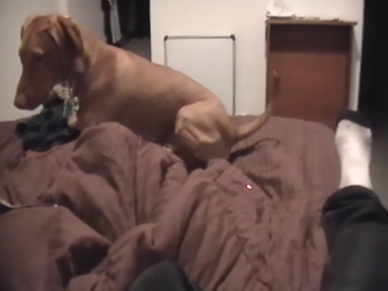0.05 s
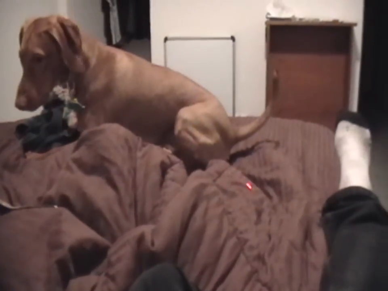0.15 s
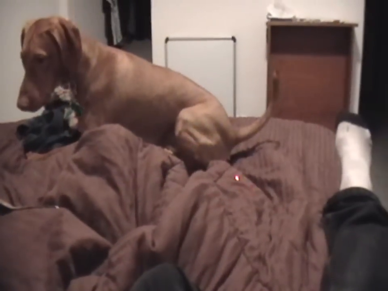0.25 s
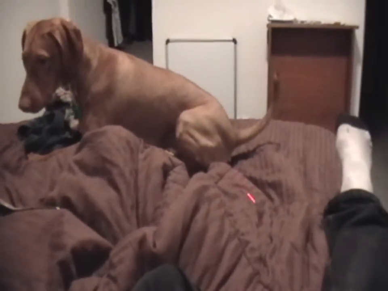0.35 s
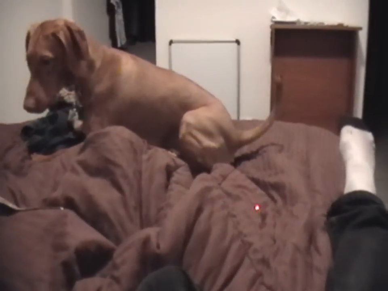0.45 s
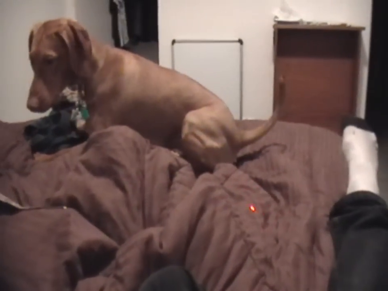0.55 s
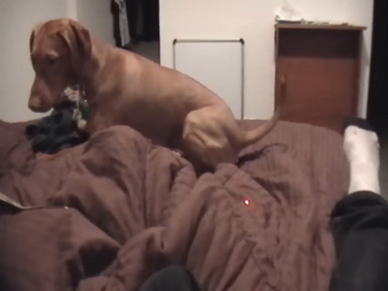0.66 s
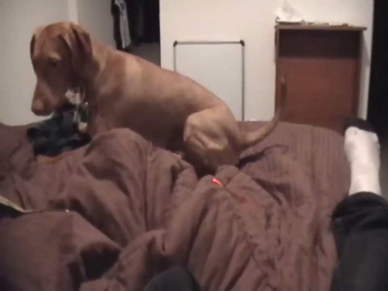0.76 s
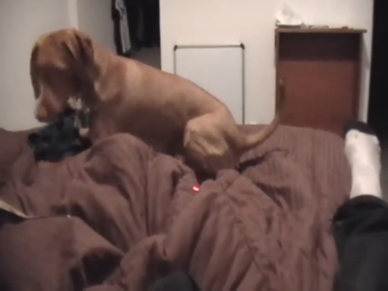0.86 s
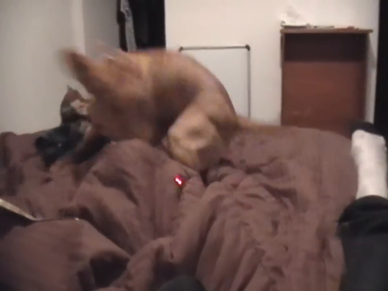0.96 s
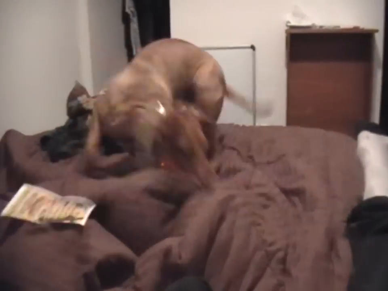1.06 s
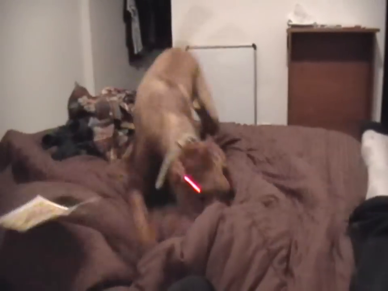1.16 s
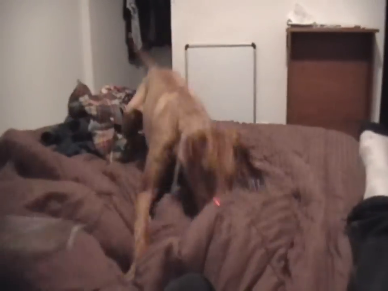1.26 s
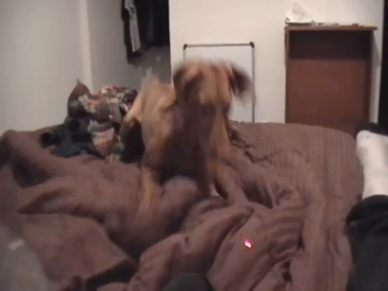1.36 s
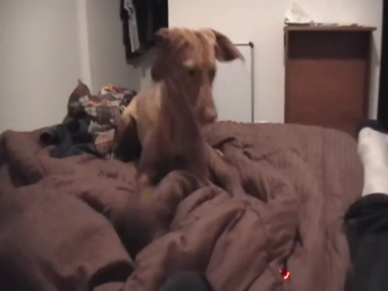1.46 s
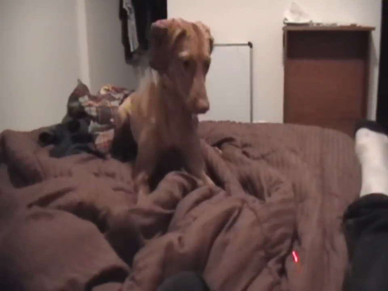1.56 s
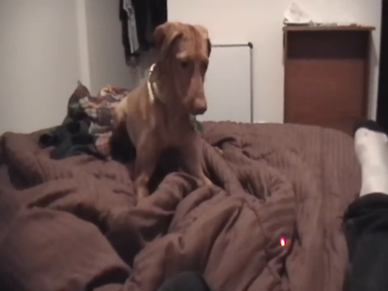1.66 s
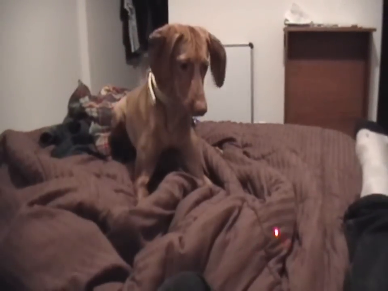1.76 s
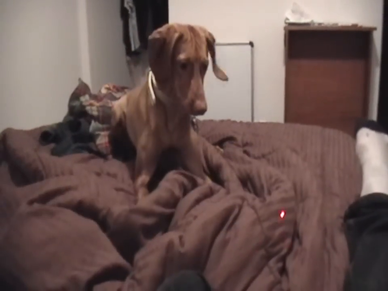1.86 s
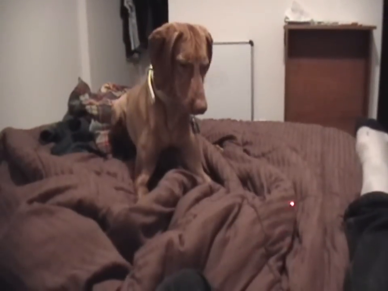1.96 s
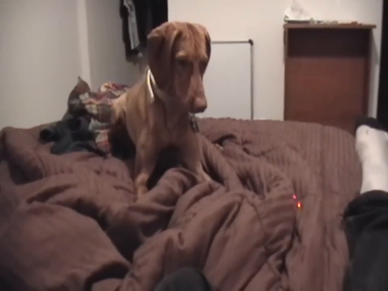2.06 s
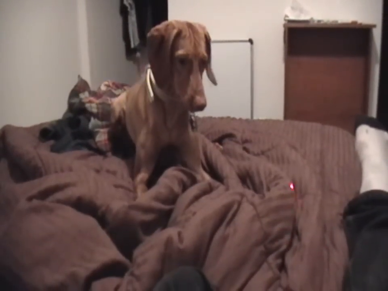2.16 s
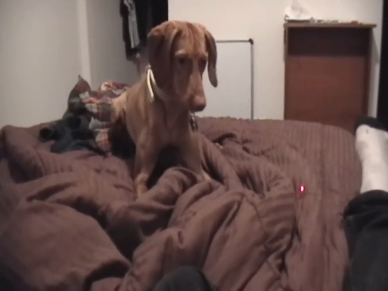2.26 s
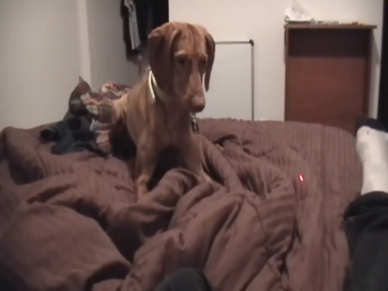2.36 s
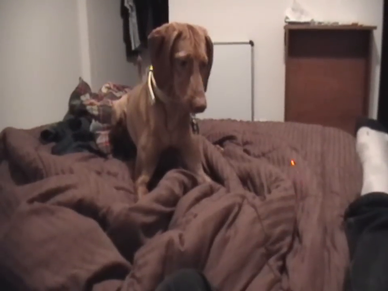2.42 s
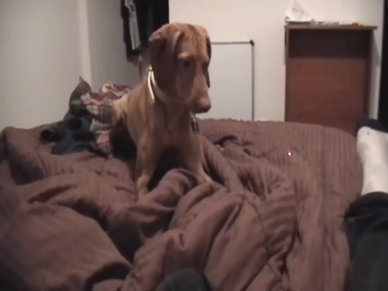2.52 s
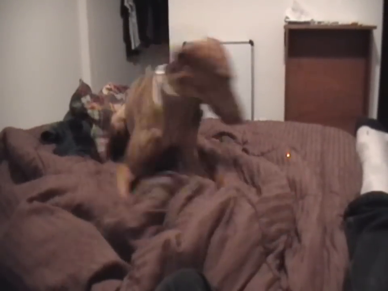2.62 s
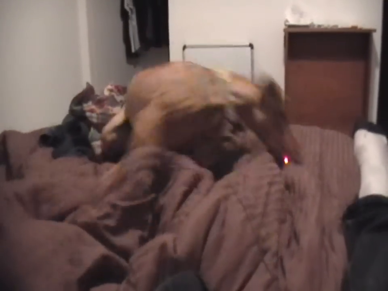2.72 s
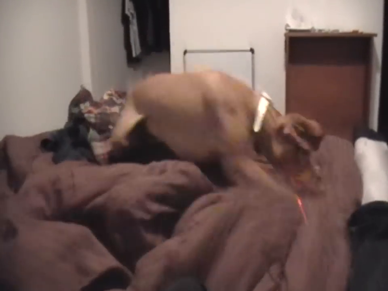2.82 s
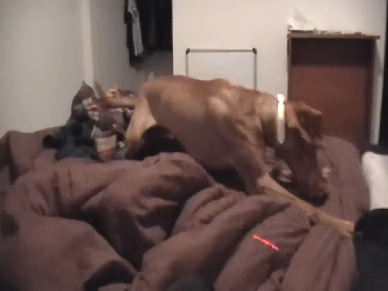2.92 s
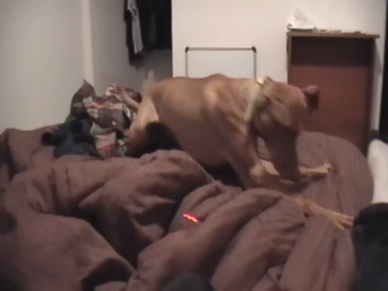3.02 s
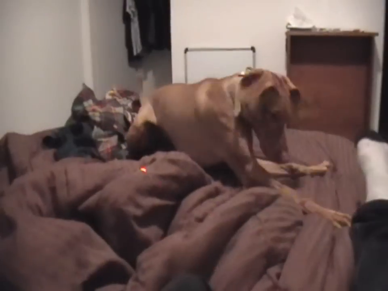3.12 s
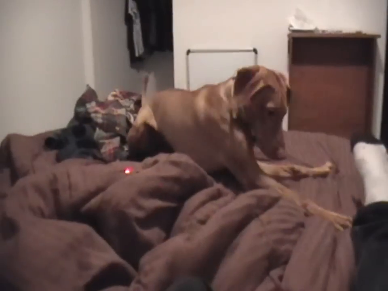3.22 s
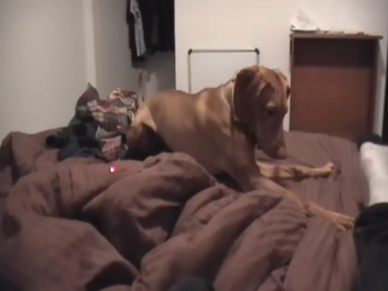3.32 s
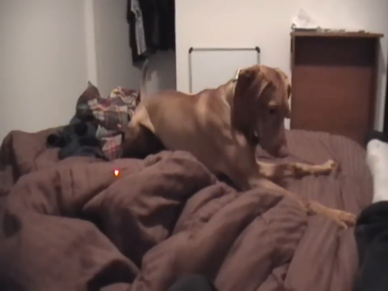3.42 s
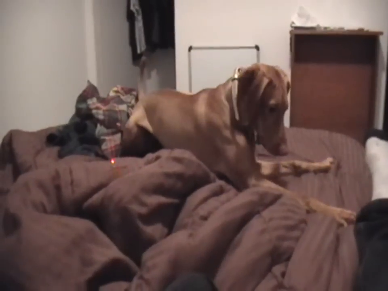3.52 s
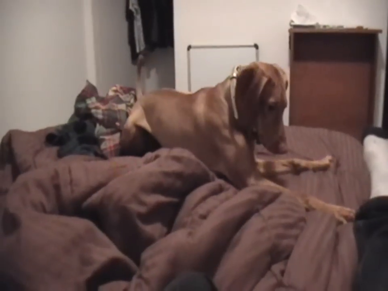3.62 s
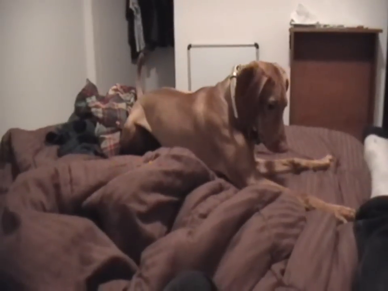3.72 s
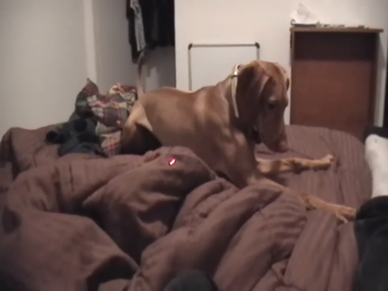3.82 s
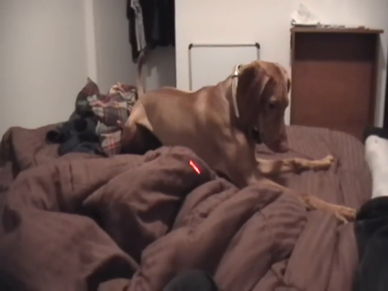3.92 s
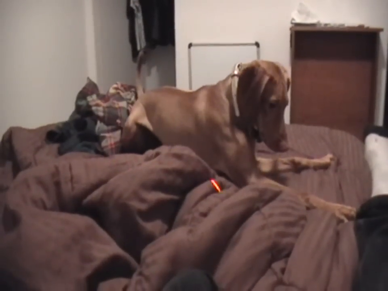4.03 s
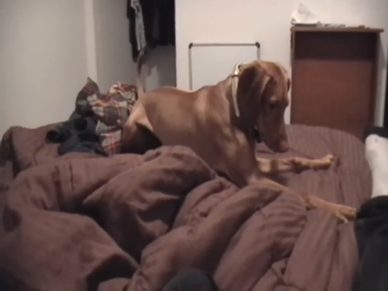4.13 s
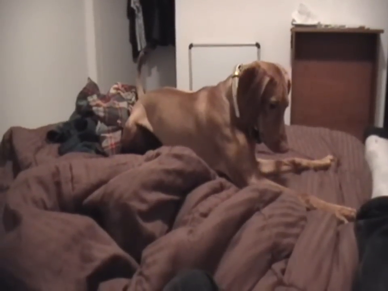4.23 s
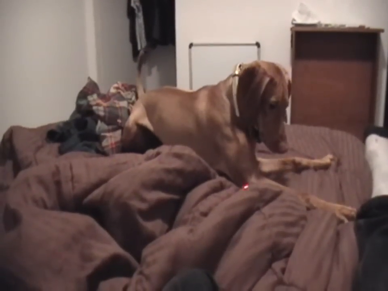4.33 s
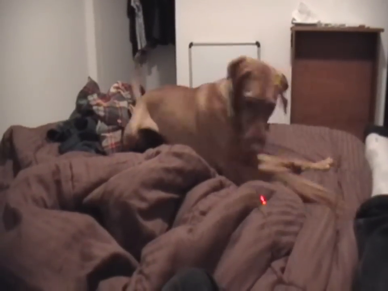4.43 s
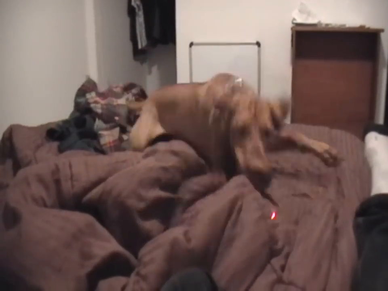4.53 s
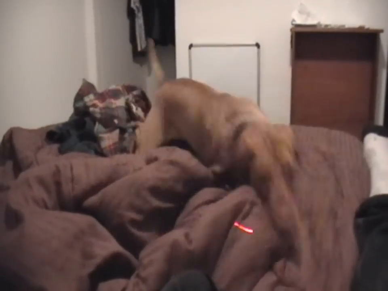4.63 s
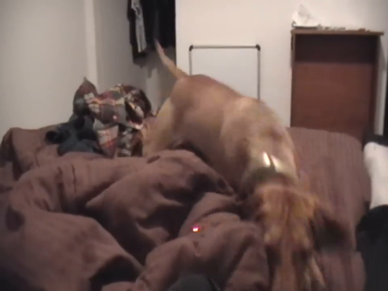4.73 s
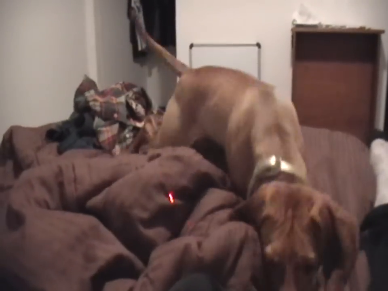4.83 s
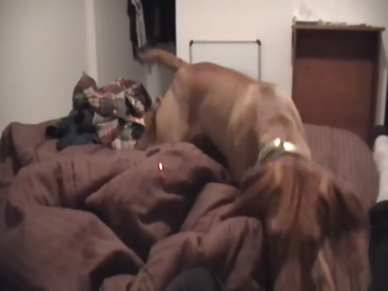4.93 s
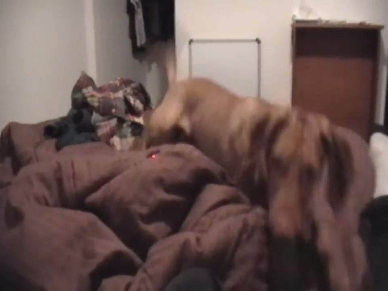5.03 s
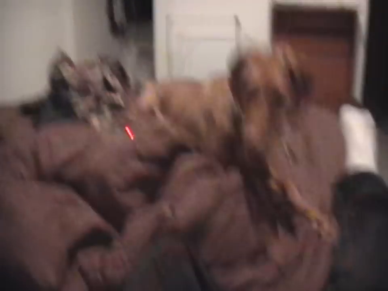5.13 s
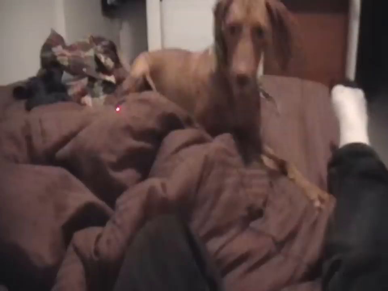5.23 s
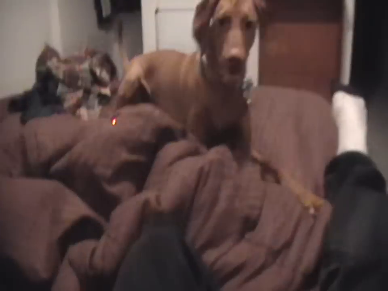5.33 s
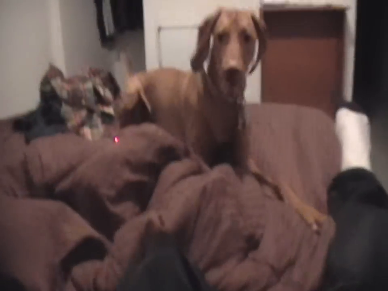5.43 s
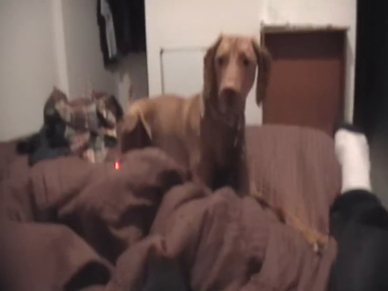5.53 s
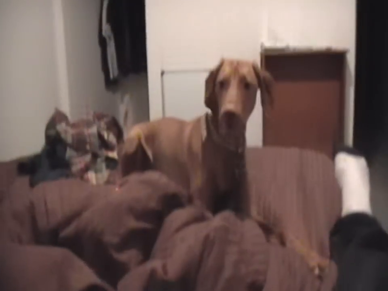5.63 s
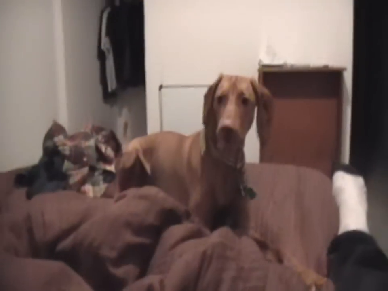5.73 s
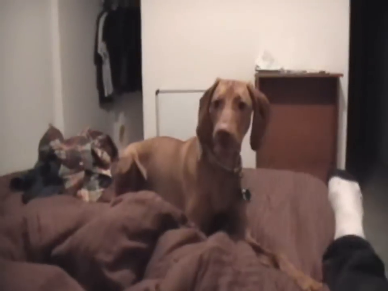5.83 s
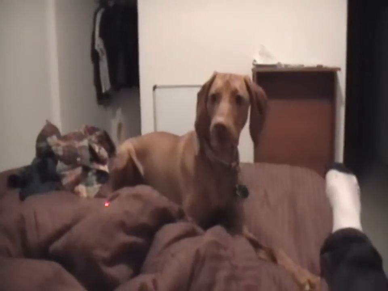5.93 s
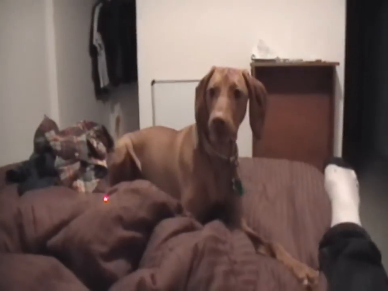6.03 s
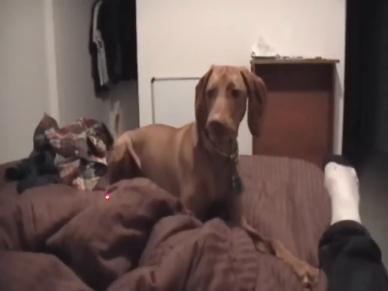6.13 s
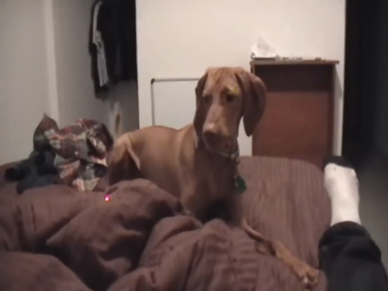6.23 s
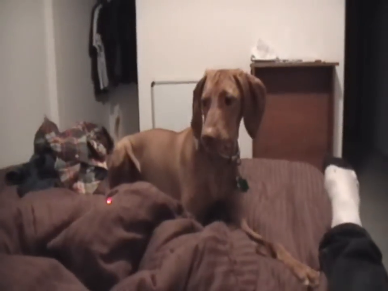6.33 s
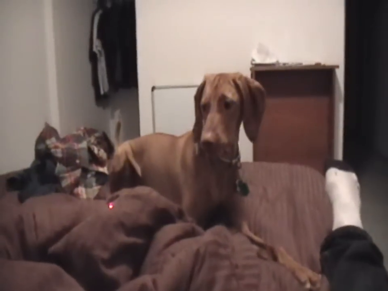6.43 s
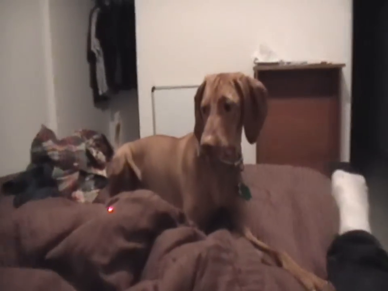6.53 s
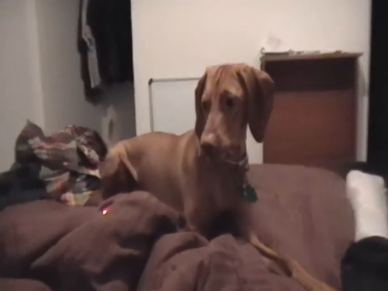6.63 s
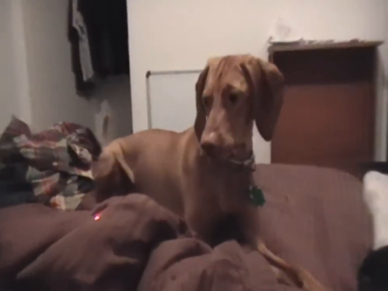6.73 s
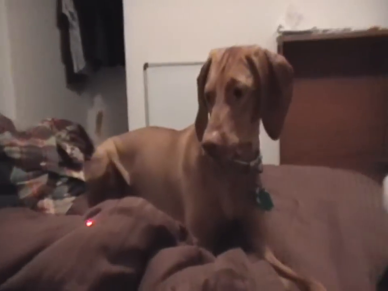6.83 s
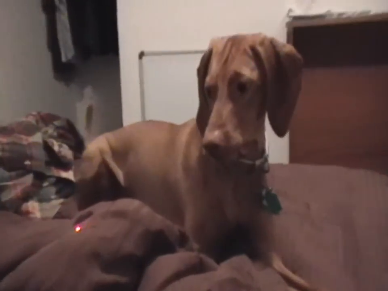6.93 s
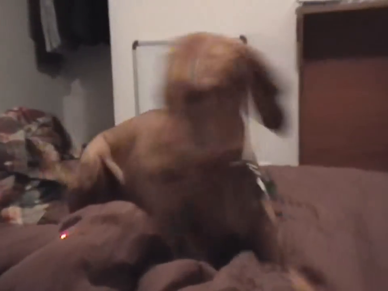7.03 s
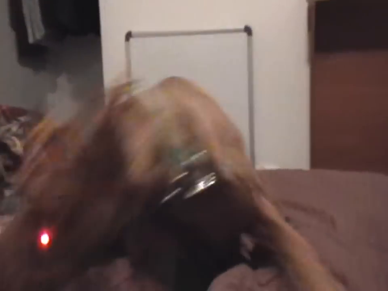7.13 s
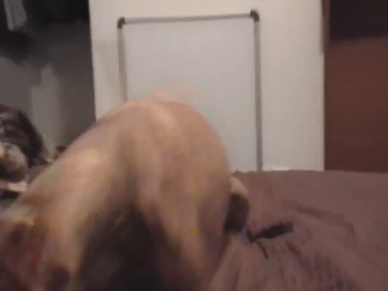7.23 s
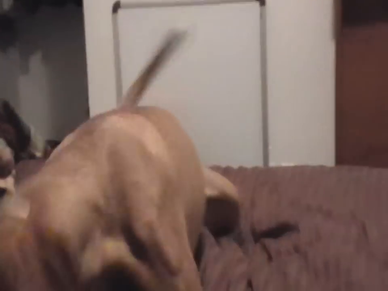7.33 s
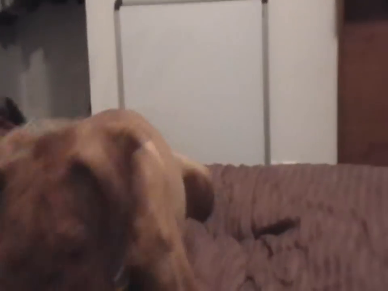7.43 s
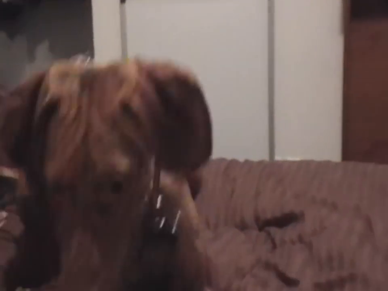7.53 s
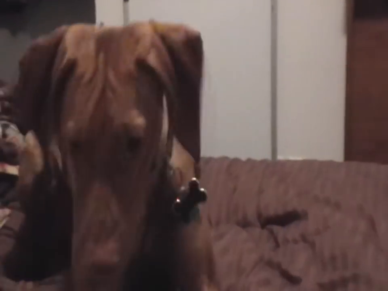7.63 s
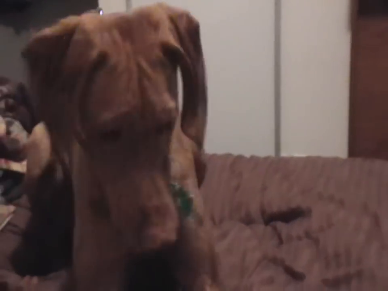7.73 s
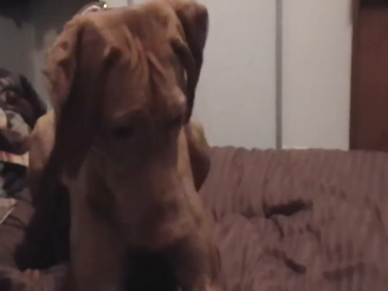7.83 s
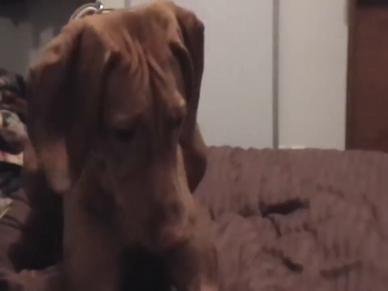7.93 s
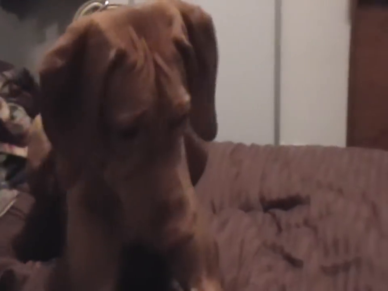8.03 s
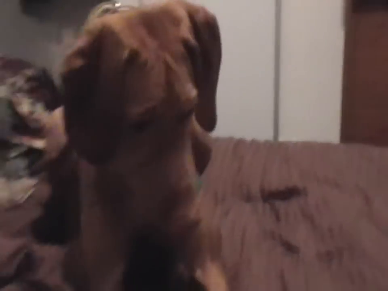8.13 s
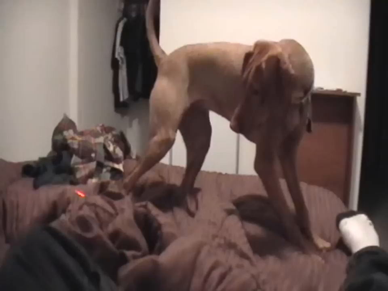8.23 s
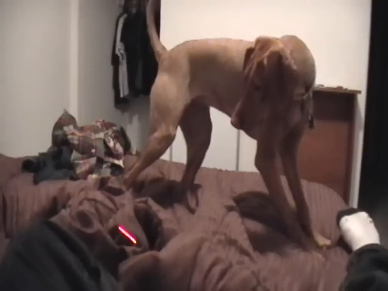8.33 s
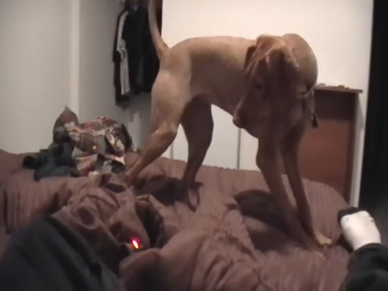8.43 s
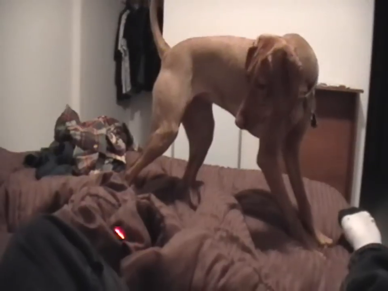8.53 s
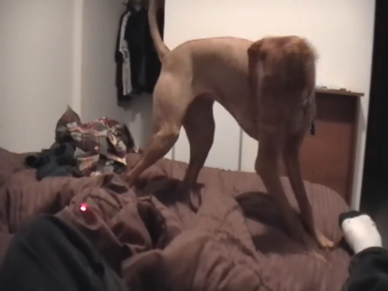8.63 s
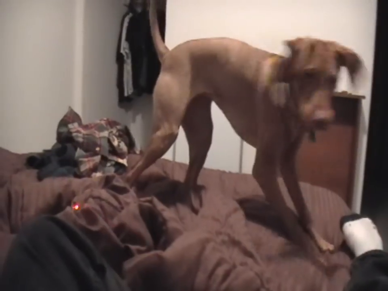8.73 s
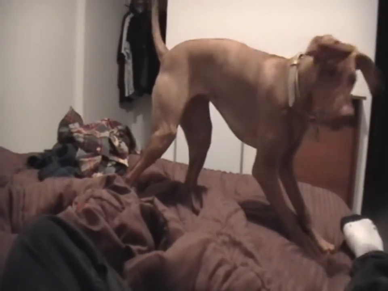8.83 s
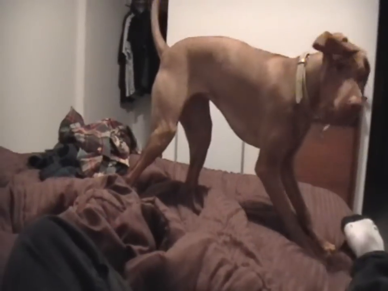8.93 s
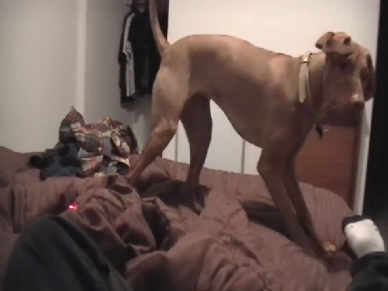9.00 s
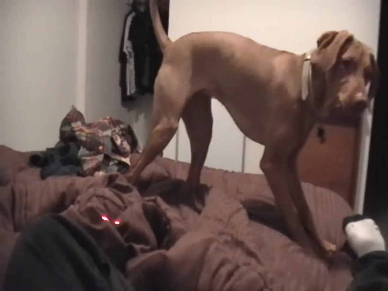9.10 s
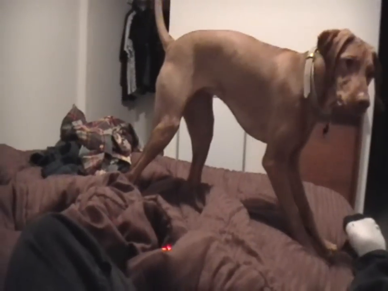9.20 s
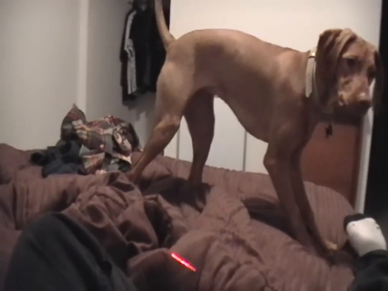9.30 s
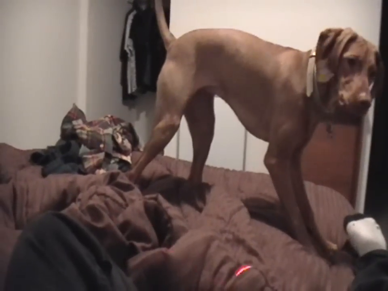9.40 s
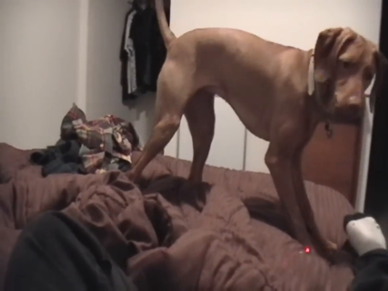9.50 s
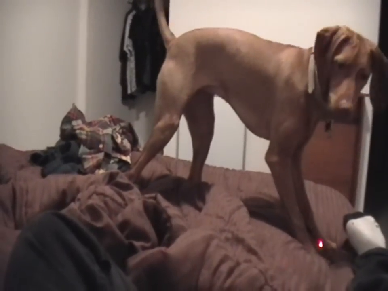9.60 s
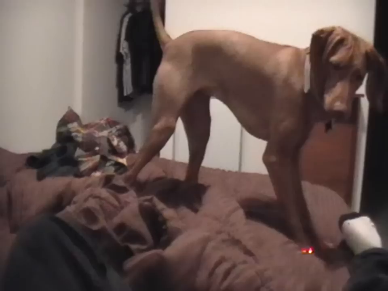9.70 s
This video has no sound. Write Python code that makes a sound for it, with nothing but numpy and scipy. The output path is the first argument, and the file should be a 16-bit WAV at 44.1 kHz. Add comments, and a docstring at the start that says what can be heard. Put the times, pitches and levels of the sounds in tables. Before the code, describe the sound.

Bright, dry tag clinks come in bursts, mostly pinched short, some ringing for a moment, with dull flat knocks among them. Each burst goes with a lunge: bedding swishes, paws scuff and thump the soft mattress. Near-silent gaps show only steady, soft fan noise. The strongest shake comes late, followed by a tiny wavering whine and a single clink. A close stereo microphone hears a small, slightly reverberant room.

```python
"""Collar tags, bedding and a small fan

A dog pounces after a spot of light on a bed in a small bedroom.
Its collar tags clack by broadband contact noise and ring briefly as decaying plate modes.
The duvet and collar rustle as filtered friction noise; paws slap, thud and boom the mattress.
The dog whines thinly once, as a wavering tone with one overtone; fan air noise and tones run on."""
import sys
import numpy as np
from scipy import signal
from scipy.fft import rfft, irfft
from scipy.io import wavfile

SR = 44100
rng = np.random.default_rng(int(sys.argv[2]) if len(sys.argv) > 2 else 0)


def dump_mix(stems):
    """Bounce the given channels to the path in sys.argv[1] as a 16-bit WAV at rate SR."""
    frames = np.atleast_2d(stems).T  # one column per channel
    limited = np.clip(frames, -1, 1)  # hard clip at full scale
    pcm = np.round(limited * 32767).astype(np.int16)
    wavfile.write(sys.argv[1], SR, pcm)


N = 430416
TIME = np.arange(N) / SR

# Event levels and spectra below are relative: scene() adds an offset to most of them.
LARGE, MIDDLE, SMALL = 6580, 6900, 7300   # nominal low mode of each tag (Hz)
PINCHED, BRIEF, FREE, LOOSE = 0.0028, 0.016, 0.024, 0.06   # ringing before a tag falls on its neighbour (s)
# clinks of the tags, loud and faint:
# time_s, low_mode_hz (tag struck), free_ring_s, clack_energy_db, low_mode_db, high_mode_db
CLINKS = [(0.063, LARGE, PINCHED, -20, -62, -38), (0.111, LARGE, PINCHED, -17, -52, -25),
          (0.1355, SMALL, PINCHED, -14, -63, -23.5), (0.3515, MIDDLE, PINCHED, -25.5, -76, -44),
          (0.4463, MIDDLE, PINCHED, -29, -44.5, -45), (0.512, LARGE, FREE, -35, -57, -41),
          (0.5303, LARGE, PINCHED, -31, -54, -38), (1.0489, MIDDLE, FREE, -23, -56, -39),
          (1.1053, MIDDLE, PINCHED, -12, -40.5, -22.5), (1.116, MIDDLE, PINCHED, -11.5, -43, -26.5),
          (1.247, MIDDLE, PINCHED, -15, -51, -32), (1.2653, MIDDLE, FREE, -11, -31.5, -29.5),
          (1.423, MIDDLE, FREE, -18, -42, -27), (1.4367, MIDDLE, BRIEF, -24, -39, -28),
          (1.5156, MIDDLE, FREE, -25, -42.5, -33), (1.5851, LARGE, PINCHED, -38, -55, -33.5),
          (1.6452, LARGE, PINCHED, -17.5, -36.5, -38), (1.7067, MIDDLE, FREE, -14.5, -36.5, -33.5),
          (1.763, MIDDLE, FREE, -30, -42, -32.5), (1.7782, LARGE, LOOSE, -30, -35, -35),
          (2.105, LARGE, FREE, -32, -66, -48), (2.802, MIDDLE, FREE, -32, -42, -40),
          (2.8245, MIDDLE, PINCHED, -19, -38, -28.5), (2.8632, MIDDLE, PINCHED, -33, -60, -28.5),
          (3.085, MIDDLE, BRIEF, -5.5, -41.5, -26.5), (3.108, MIDDLE, BRIEF, -24, -37.5, -23),
          (3.3486, MIDDLE, BRIEF, -10, -30.5, -18), (3.3772, SMALL, PINCHED, -5, -23, -28),
          (3.388, SMALL, PINCHED, -18, -31.5, -26), (3.6867, LARGE, LOOSE, -28.5, -51.5, -62),
          (4.5804, MIDDLE, FREE, -22, -36.5, -39), (4.7679, MIDDLE, BRIEF, -23, -46, -32),
          (5.0304, MIDDLE, FREE, -18, -42.5, -46), (5.1367, LARGE, PINCHED, -20, -61, -25),
          (5.2856, LARGE, FREE, -17, -37, -52), (5.3472, LARGE, FREE, -29, -63, -38),
          (5.4161, LARGE, PINCHED, -5, -45, -36), (5.7767, MIDDLE, PINCHED, -10.5, -53, -33),
          (7.3435, MIDDLE, PINCHED, -22, -38, -27), (7.3512, LARGE, PINCHED, -7, -42, -43),
          (7.4069, MIDDLE, BRIEF, -30, -38.5, -35), (7.4152, MIDDLE, PINCHED, -11.5, -31.5, -35),
          (7.425, MIDDLE, BRIEF, -23, -29, -29.5), (7.4494, LARGE, PINCHED, -23, -39, -41),
          (7.595, MIDDLE, FREE, -34, -39.5, -34.5), (7.6728, MIDDLE, BRIEF, -3, -20, -17),
          (7.6982, MIDDLE, PINCHED, -2.5, -33, -25.5), (7.7043, MIDDLE, PINCHED, -9, -35, -30.5),
          (9.2072, LARGE, PINCHED, -18.5, -45, -30)]
# glancing touches that hardly ring: time_s, clack_energy_db
TICKS = [(0.1547, -32), (0.375, -33), (1.0803, -18.5), (1.2115, -22), (1.3934, -14), (1.9506, -31),
         (2.7263, -42), (2.7715, -18.5), (2.787, -17), (2.8854, -25), (3.0457, -18), (3.1592, -19.5),
         (3.3007, -29), (3.5237, -26), (3.574, -26), (3.625, -26), (3.8146, -29), (4.5276, -39.5),
         (4.6413, -20.5), (4.9042, -15), (4.9107, -13.5), (5.176, -26), (5.3625, -20), (5.3883, -23.5),
         (5.6916, -18), (5.7084, -34), (5.7866, -28), (5.8208, -12), (5.905, -31), (6.2151, -29),
         (6.2649, -31), (6.321, -35), (7.3858, -19), (7.4334, -24), (7.5635, -20), (7.719, -16),
         (7.7336, -24), (7.9993, -20.5), (8.8775, -27.5)]
# tags buzzing on each other after a hard knock: start_s, length_s, low_mode_hz, clack_db, ring_db
BUZZES = [(3.382, .14, 7180, -18, -31), (4.776, 0.098, 6890, -27, -41.5), (5.416, .045, 6900, -18, -52),
          (7.694, 0.058, 6910, -21.5, -38)]
BUZZ_FADE_DB, BUZZ_BEND_HZ = 16.5, 420   # fade over the buzz; changing pressure bends the low mode
# flat, face-on knocks of the tags: time_s, energy_db, pitch_ratio
KNOCKS = [(2.726, -28, 1.43), (5.2863, -12, 1.3), (5.415, -12, 0.97), (5.6921, -10, 1.23), (7.351, 2, 0.96),
          (7.999, -15.5, 1.14), (9.208, -11, 1.03)]
HIGH_MODE_HZ, LOW_T60_S, HIGH_T60_S = 11414, 0.15, 0.11   # nominal mode; decay times while free
MID_MODE_HZ, MID_MODE_DB, MID_MODE_T60_S = 9810, -21.5, 0.046   # weaker mode, relative to the high one

# head movements that swing the collar: full_level_s, hold_s, level_db
SWINGS = [(0.0, 0.011, -43), (0.375, 0.097, -53.5), (1.096, 0.68, -38.5), (1.961, 0.16, -53.5),
          (2.802, 0.47, -44), (3.334, 0.41, -50.5), (4.617, 0.032, -44), (4.793, 0.025, -34.5),
          (5.32, 0.17, -42.5), (5.6, 0.1, -54.5), (6.18, 0.076, -56), (7.245, 0.57, -46.5),
          (8.813, 0.11, -52), (9.13, 0.14, -55)]
SWING_RISE_S, SWING_FALL_DB_PER_S = 0.093, 77.5
# a clink leaves the tags shivering, in proportion to its strength
SHIVER_DB, SHIVER_RISE_S, SHIVER_FALL_DB_PER_S = -42, 0.002, 110.5
# faint singing of the sliding split ring: middle_s, half_length_s, level_db
SINGING = [(2.25, 0.23, -72), (3.717, 0.14, -65.5), (5.915, 0.0071, -51.5), (6.153, 0.023, -54),
           (6.225, 0.0056, -56), (6.32, 0.0078, -57), (8.125, 0.0057, -56), (9.172, 0.18, -66.5)]
SPLIT_RING_HZ = 4180

DEEP, LIGHT = -12.5, -25.5   # boom of the mattress (dB, added to the landing's level)
# paws landing: time_s, level_db, boom_db
PAWS = [(1.276, -11.5, LIGHT), (1.615, -31, LIGHT), (2.903, -18, DEEP), (2.932, -12, LIGHT),
        (2.988, -16.5, DEEP), (4.76, -23, LIGHT), (4.857, -27, LIGHT), (5.053, -27.5, LIGHT),
        (7.527, -17.5, LIGHT), (8.836, -36, LIGHT)]
MATTRESS_HZ, MATTRESS_S = 94.9, 0.013   # boom pitch; time at which its envelope peaks
SLACK, TAUT = 1.4, 3.4   # sharpness of the cloth's resonance (Q)
# paws scuffing and tapping the cover: full_level_s, hold_s, level_db, centre_hz, cloth_q
SCUFFS = [(1.257, 0.028, -26, 1000, SLACK), (1.617, 0.026, -35.5, 1750, SLACK),
          (2.9316, 0.0033, -30.5, 2800, SLACK), (2.937, 0.052, -26, 740, SLACK),
          (3.281, 0.032, -47, 666, TAUT), (4.8582, 0.0018, -22, 960, SLACK),
          (4.862, 0.025, -36, 1300, SLACK), (5.058, 0.025, -40, 1550, TAUT),
          (5.22, 0.058, -36.5, 1370, SLACK), (5.237, 0.081, -40.5, 820, TAUT),
          (7.26, 0.017, -40.5, 5050, SLACK), (7.316, 0.01, -40.5, 1490, SLACK),
          (7.502, 0.063, -41, 1730, SLACK), (8.131, .006, -51.5, 1490, SLACK),
          (8.203, 0.0088, -50, 697, TAUT), (8.764, 0.08, -49, 2950, TAUT)]
SCUFF_RISE_SHARE, SCUFF_FALL_DB = 0.39, 10.5   # rise as a share of the hold; fall over one more hold
# weight shifting on the duvet: hardest_push_s, rustle_db, fall_db_per_s
MOVES = [(1.13, -37, 36), (1.29, -27.5, 73), (1.62, -45, 78), (2.80, -42, 60.5), (2.96, -30.5, 77),
         (4.622, -40, 33), (4.78, -36, 61), (5.07, -39.5, 36), (5.26, -39.5, 63), (7.23, -42, 55.5),
         (7.332, -34.5, 112.5), (7.55, -40, 73), (7.68, -42.5, 146), (8.82, -48, 64)]
MOVE_RISE_S = 0.14
FIDGET_S, FIDGET_DB = 6.7, -63.5   # from then on the bedding never quite rests
# a thin whine that rises, breaks and sinks: time_s, pitch_hz, level_db
WHINE = [(8.51, 4120, -73.5), (8.6, 4270, -69), (8.67, 4560, -66), (8.705, 4570, -80), (8.73, 4590, -62),
         (8.79, 4540, -80)]

# spectra of tags meeting edge on and face to face: frequency_hz, level_db
BRIGHT_CLACK = [(1500, -28.5), (4000, -3.5), (5000, -9), (6300, 1), (11700, 1), (13000, -7.5), (14600, -10),
                (16000, -23.5)]
DULL_CLACK = [(700, -30.5), (1500, -11.5), (2500, 3.5), (4000, -4.5), (5500, -1), (9000, -33)]
# spectra of the deep duvet, its cover, dragged cloth and the collar: frequency_hz, level_db
DUVET = [(25, -47), (55, -15), (92, -2), (165, -2), (270, 4.5), (390, 1.5), (900, -27.5), (2500, -54.5)]
CLOTH = [(200, -15), (680, 5.5), (950, 0.5), (1500, -1), (5000, -12.5), (10000, -14.5), (15000, -33.5)]
SCUFF = [(300, 6), (2300, -10), (12000, -18.5)]
COLLAR = [(2000, -3), (4100, 3), (6700, 4), (11500, -4), (13000, -10), (14600, -18), (16000, -33.5)]
# spectrum of the steady air noise: frequency_hz, level_db
AIR_NOISE = [(20, -32), (52, -14.5), (110, -4), (170, -7), (370, -5.5), (520, -10), (900, -14),
             (2200, -19.5), (3000, -23), (11600, -37), (12600, -52), (15000, -67)]
# motor and blade tones of the fan: frequency_hz, level_db
FAN_LINES = [(118.4, -69.5), (376.8, -69.5), (613.7, -75.5), (845.2, -72.5), (1685, -79.5)]
# left-right likeness of diffuse sound: frequency_hz, likeness (0-1)
LIKENESS = [(120, 0.1), (300, 0.4), (900, 0.2), (4500, 0.5), (12000, 0.3)]
# reverberation of the bedroom: frequency_hz, t60_s
ROOM_T60 = [(200, 0.17), (3000, 0.38), (7000, 0.32), (14000, 0.17)]
FULL_SCALE, CUTOFF_HZ = 0.8, 16800   # clipping level; edge of the low-pass stop band


def tags(contacts, bright_db, low_db, high_db, pinned_t60, detune_hz):
    """Modal excitation: each contact clacks and rings plate modes, detuned more widely if soon pinched."""
    clacks, rings = np.zeros((2, N))
    for s, low_hz, free_s, clack_level, low_level, high_level in contacts:
        clack = contact(chatter_s=0.00069, skid_db=-21.5, skid_s=0.0045)
        add(clacks, s, from_db(clack_level + bright_db) * clack)
        low_shift, high_shift = detune_hz * np.sqrt(PINCHED / free_s) * rng.uniform(-1, 1, 2)
        high_gain_db = high_level + high_db
        modes = [(low_hz + low_shift, low_level + low_db, LOW_T60_S),
                 (HIGH_MODE_HZ + high_shift, high_gain_db, HIGH_T60_S),
                 (MID_MODE_HZ - high_shift, high_gain_db + MID_MODE_DB, MID_MODE_T60_S)]
        for hz, level_db, t60 in modes:
            add(rings, s, from_db(level_db) * ring(hz, free_s, pinned_t60, t60))
    return colour(clacks, BRIGHT_CLACK) + rings


def contact(chatter_s, skid_db, skid_s, rise_s=0.0004, size=1024):
    """Contact noise: pressure builds, metal chatters, then the faces skid briefly; unit energy."""
    t = np.arange(size) / SR
    pressure = 1 - np.exp(-t / rise_s)
    chatter = np.exp(-t / chatter_s)
    skid = from_db(skid_db) * np.exp(-t / skid_s)
    burst = rng.choice([-1, 1], size) * pressure * (chatter + skid)
    return burst / np.linalg.norm(burst)


def ring(hz, free_s, pinned_t60, t60, waver_hz=20, size=4400):
    """Damped mode: a tag rings with wavering pitch until its neighbour adds damping."""
    t = np.arange(size) / SR
    decay_db = -60 * (t / t60 + np.maximum(t - free_s, 0) / pinned_t60)
    # random-walk phase, in cycles
    slide = np.cumsum(rng.standard_normal(size)) * np.sqrt(waver_hz / (2 * np.pi * SR))
    return from_db(decay_db) * np.sin(2 * np.pi * (hz * t + slide + rng.random()))


def ticks(low_db, high_db):
    """Weak modal excitation: glancing contacts are nearly all clack."""
    return [(s, LARGE, PINCHED, db, db + low_db, db + high_db) for s, db in TICKS]


def buzzes(high_db, spread_db, count=24):
    """Repeated impact: quick runs of fading rebounds, each at a slightly different pitch."""
    rows = []
    for s, length, hz, clack_db, ring_db in BUZZES:
        for k, (late, bend, strength) in enumerate(rng.uniform(-1, 1, (count, 3))):
            progress = (k + late / 2) / count
            db = spread_db * strength - BUZZ_FADE_DB * progress
            rows.append((s + progress * length, hz + BUZZ_BEND_HZ * bend, PINCHED,
                         clack_db + db, ring_db + db, ring_db + db + high_db))
    return rows


def touches(per_s, unevenness, count=1000):
    """Random point process: moments at which swinging tags meet, at uneven gaps."""
    gaps = np.exp(unevenness * rng.standard_normal(count)) / per_s
    at = (np.cumsum(gaps) * SR).astype(int)
    return at[at < N]


def rattle(shake, at, spread_db, clack_db, low_db, high_db):
    """Random impact: swinging tags touch lightly, with strength following the shaking."""
    shake_db = 20 * np.log10(shake[at, None])
    levels = shake_db + [clack_db, low_db, high_db] + spread_db * rng.uniform(-0.9, 1, (len(at), 3))
    struck = rng.choice([LARGE, MIDDLE], len(at))
    return [(i / SR, hz, BRIEF, *db) for i, hz, db in zip(at, struck, levels)]


def knocks(dull_db):
    """Overdamped impact: tags that meet face to face give a dull clack and no ring."""
    out = np.zeros(N)
    for s, level, pitch in KNOCKS:
        knock = contact(chatter_s=0.0005, skid_db=-25.0, skid_s=0.0065)
        spectrum = np.multiply(DULL_CLACK, [pitch, 1])
        add(out, s, from_db(level + dull_db) * colour(knock, spectrum))
    return out


def paws(thud_db, slap_db, thud_s, size=8000):
    """Impact on a soft layer: a paw slaps the cover, thuds and sets the mattress booming."""
    t = np.arange(size) / SR
    boom = np.sin(2 * np.pi * MATTRESS_HZ * t) * t / MATTRESS_S * np.exp(1 - t / MATTRESS_S)
    pushes, booms = np.zeros((2, N))
    for s, level_db, boom_db in PAWS:
        add(pushes, s, from_db(level_db) * rng.standard_normal(size) * np.exp(-t / thud_s))
        add(booms, s, from_db(level_db + boom_db) * boom)
    thuds = from_db(thud_db) * colour(pushes, DUVET)
    slaps = from_db(slap_db) * colour(pushes, CLOTH)
    return thuds + slaps + booms


def duvet(rustle):
    """Friction noise: bedding rubs as the dog moves; its bass grows faster than its rustle."""
    # harder moves press deeper
    deep = from_db(4.5) * rustle ** 1.151 * friction(DUVET, grain_db=2.0, grains_per_s=90, side_db=-18.5)
    cover = from_db(-3.0) * rustle * friction(CLOTH, grain_db=2.0, grains_per_s=180)
    return deep + cover


def scuffs(grain_db):
    """Resonant friction: cloth dragged under a paw is band-passed at each drag's own pitch."""
    rub, out = friction(SCUFF, grain_db, grains_per_s=300), 0
    for s, length, level_db, hz, q in SCUFFS:
        band = rms_one(signal.lfilter(*signal.iirpeak(hz, q, fs=SR), rub))
        drag = gesture(s, length, level_db, SCUFF_RISE_SHARE * length, SCUFF_FALL_DB / length)
        out = out + band * together([drag])
    return out


def strap(shake):
    """Friction noise: the shaken collar rubs in small uneven slips."""
    return from_db(-4.5) * shake * friction(COLLAR, grain_db=3.5, grains_per_s=300)


def singing(q, grain_db):
    """Stick-slip resonance: tiny slips keep the split ring's damped resonance flickering."""
    slips = rng.standard_normal(N) * from_db(grain_db * np.clip(drift(160), -2, 2))
    resonance = signal.iirpeak(SPLIT_RING_HZ, q, fs=SR)
    once = signal.lfilter(*resonance, slips)
    tone = rms_one(signal.lfilter(*resonance, once))
    return tone * sum(from_db(level_db) * swell(s, half_s) for s, half_s, level_db in SINGING)


def whines(waver):
    """Harmonic tone: a wavering, nearly pure whine with one overtone of half its strength."""
    s, pitch_hz, level_db = np.transpose(WHINE)
    hz = np.interp(TIME, s, pitch_hz) * (1 + waver * drift(170))
    phase = 2 * np.pi * np.cumsum(hz) / SR
    sounding = (TIME > s[0]) * (TIME < s[-1])
    return sounding * from_db(np.interp(TIME, s, level_db)) * (np.sin(phase) + np.sin(2 * phase) / 2)


def bedroom(x, first_echo_s, build_s, size=24000):
    """Reverberation: diffuse reflections build quickly, then decay at a rate set by frequency."""
    t = np.arange(size) / SR
    f = np.fft.rfftfreq(size, 1 / SR)
    white, tail = rfft(rng.standard_normal((2, size))), 0
    edges = [0, 500, 2000, 5000, 8000, 11000, 13000, SR / 2]   # bands (Hz)
    for low, high in zip(edges, edges[1:]):
        decay = from_db(-60 * t / at_hz(ROOM_T60, (low + high) / 2))
        tail = tail + irfft(white * ((f >= low) & (f < high)), size) * decay
    tail = tail * np.clip((t - first_echo_s) / build_s, 0, 1)
    # unit energy in the mid signal
    response = diffuse(*tail) / np.linalg.norm(tail[0])
    return signal.oaconvolve(x[None], response, axes=1)[:, :N]


def fan(air_db, hum_db, wander):
    """Flow noise and rotation tones: steady air noise with slightly unsteady motor and blade tones."""
    hum = 0
    for hz, db in FAN_LINES:
        tone = np.sin(2 * np.pi * hz * TIME + wander * drift(11))
        hum = hum + from_db(db + hum_db) * np.sqrt(2) * tone   # levels are RMS
    air = diffuse(*[colour(noise, AIR_NOISE) for noise in rng.standard_normal((2, N))])
    return from_db(air_db) * rms_one(air) + hum


def motion():
    """Shared excitation: moves stir the duvet; head swings and clinks stir the collar."""
    moves = [gesture(s, 0, db, MOVE_RISE_S, fall) for s, db, fall in MOVES]
    fidget = gesture(FIDGET_S, N / SR, FIDGET_DB, MOVE_RISE_S, 0)
    swings = [gesture(s, hold, db, SWING_RISE_S, SWING_FALL_DB_PER_S) for s, hold, db in SWINGS]
    shivers = [gesture(s, 0, db + SHIVER_DB, SHIVER_RISE_S, SHIVER_FALL_DB_PER_S)
               for s, _, _, db, _, _ in CLINKS]
    return together(moves + [fidget]), together(swings + shivers)


def gesture(s, hold_s, level_db, rise_s, fall_db_per_s):
    """Envelope of motion: gain rises up to its level at a given time, holds and dies away."""
    t = TIME[::40] - s   # coarse time grid
    fallen_db = np.minimum(fall_db_per_s * np.maximum(t - hold_s, 0), 150)
    return np.clip(1 + t / rise_s, 0, 1) ** 1.61 * from_db(level_db - fallen_db)


def together(gestures):
    """Incoherent addition: overlapping gestures add in power."""
    return np.interp(TIME, TIME[::40], np.linalg.norm(gestures, axis=0))


def swell(middle_s, half_s):
    """Gaussian envelope: a smooth rise and fall."""
    return np.exp(-((TIME - middle_s) / half_s) ** 2 / 2)


def friction(spectrum, grain_db, grains_per_s, side_db=-5):
    """Friction noise: rubbing modulated by small uneven slips; unit power."""
    slips = from_db(grain_db * np.clip(drift(grains_per_s), -2.5, 2.5))
    mid, side = [colour(slips * noise, spectrum) for noise in rng.standard_normal((2, N))]
    return rms_one(diffuse(mid, from_db(side_db) * side))


def diffuse(mid, side):
    """Interchannel coherence: two signals become a stereo pair whose likeness depends on frequency."""
    alike = np.clip(at_hz(LIKENESS, np.fft.rfftfreq(len(mid), 1 / SR)), 0, 1)
    width = np.sqrt((1 - alike) / (1 + alike))
    return irfft(rfft(mid) + width * rfft(side) * [[1], [-1]], len(mid))


def colour(x, spectrum, size=4096):
    """Minimum-phase filtering: shape a signal causally to a given spectrum."""
    gain = from_db(at_hz(spectrum, np.fft.rfftfreq(size, 1 / SR)))
    cepstrum = irfft(np.log(gain))
    # fold the cepstrum onto positive times
    cepstrum[1:size // 2] *= 2
    cepstrum[size // 2 + 1:] = 0
    response = irfft(np.exp(rfft(cepstrum)))
    return signal.oaconvolve(x, response)[:len(x)]


def drift(rate):
    """Band-limited fluctuation: smooth chance of unit power, with so many new values a second."""
    return rms_one(np.interp(TIME * rate, np.arange(8192), rng.standard_normal(8192)))


def at_hz(points, hz):
    """Logarithmic frequency scale: interpolate a table along it."""
    f, value = np.transpose(points)
    return np.interp(np.log(np.maximum(hz, 1)), np.log(f), value)


def add(track, s, sound):
    """Superposition: mix a sound into a track at a given time."""
    start = int(np.clip(round(s * SR), 0, N - 1))
    track[start:start + len(sound)] += sound[:N - start]


def from_db(db):
    """Level law: decibels to amplitude gain."""
    return 10 ** (np.asarray(db) / 20)


def rms_one(x):
    """Power normalisation: scale to unit mean square."""
    return x / np.sqrt(np.mean(x ** 2) + 1e-20)


def scene():
    """Superposition of direct sound, reverberation and background: collar, bedding, dog and fan."""
    rustle, shake = motion()
    at = touches(per_s=40, unevenness=0.7)
    contacts = (CLINKS + ticks(low_db=-28.5, high_db=-25.5) + buzzes(high_db=-1.0, spread_db=2.0)
                + rattle(shake, at, spread_db=5.5, clack_db=10.5, low_db=-12.5, high_db=-7))
    # a second random draw of the same contacts gives the collar its stereo width
    mid, side = [tags(contacts, bright_db=12.0, low_db=8.0, high_db=5.5, pinned_t60=0.044, detune_hz=90)
                 for _ in range(2)]
    flat = knocks(dull_db=8.5)
    dog = paws(thud_db=11.5, slap_db=-5.0, thud_s=0.0097) + whines(waver=0.0023) + singing(q=16, grain_db=1.5)
    into_room = mid + from_db(-5.0) * flat + from_db(-4.5) * dog
    echoes = from_db(-7.0) * bedroom(into_room, first_echo_s=0.0024, build_s=0.0035)
    collar = diffuse(mid, from_db(-8.5) * side) + flat + strap(shake)
    bedding = duvet(rustle) + scuffs(grain_db=3.0)
    return collar + dog + bedding + echoes + fan(air_db=-59.0, hum_db=-0.5, wander=0.63)


def record(dry, notch_hz=495, notch_q=4.16):
    """Microphone response: a dip in the low mids, overload of the highest peaks, then a low-pass."""
    notched = signal.lfilter(*signal.iirnotch(notch_hz, notch_q, fs=SR), dry)
    clipped = np.clip(notched, -FULL_SCALE, FULL_SCALE)
    return signal.sosfilt(signal.cheby2(14, 60, CUTOFF_HZ, fs=SR, output="sos"), clipped)


dry = scene()
out = record(dry)
dump_mix(out)
```